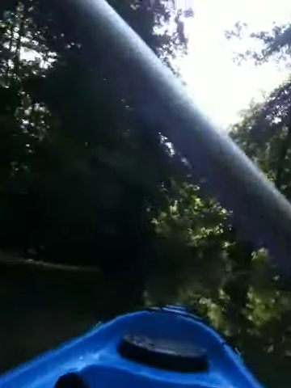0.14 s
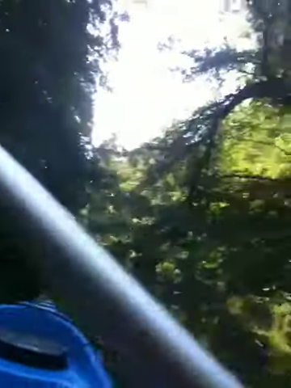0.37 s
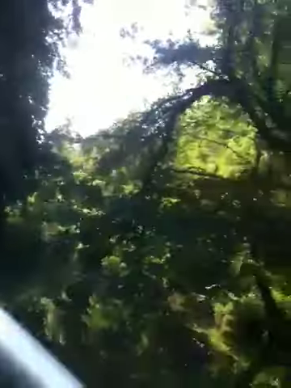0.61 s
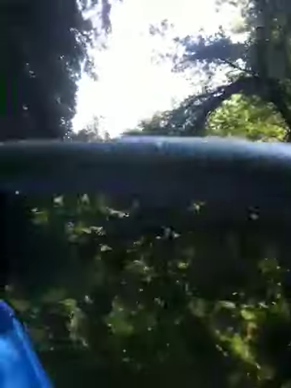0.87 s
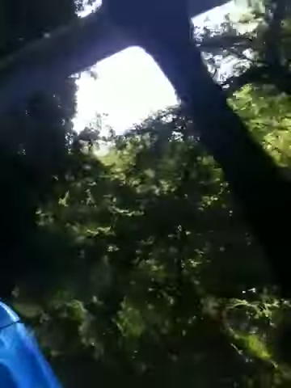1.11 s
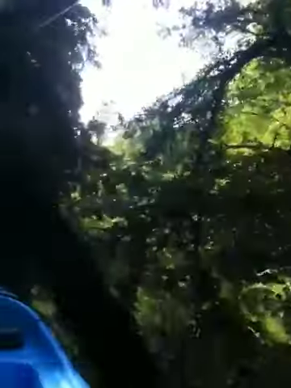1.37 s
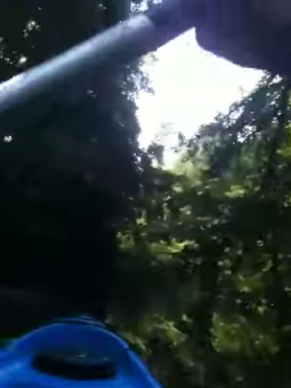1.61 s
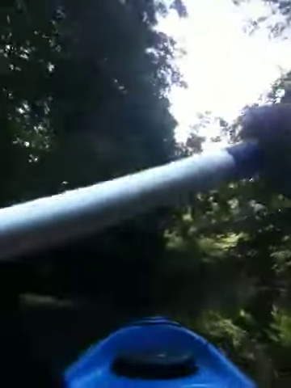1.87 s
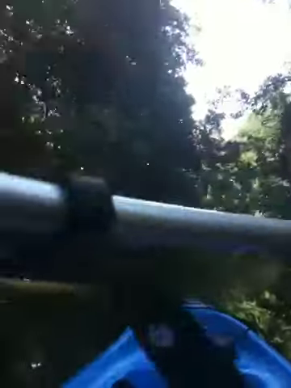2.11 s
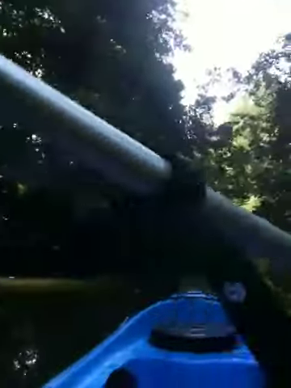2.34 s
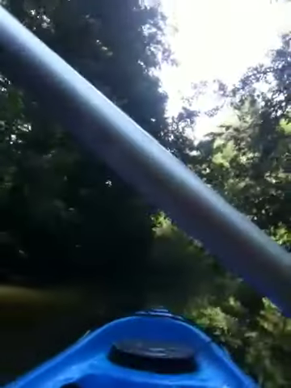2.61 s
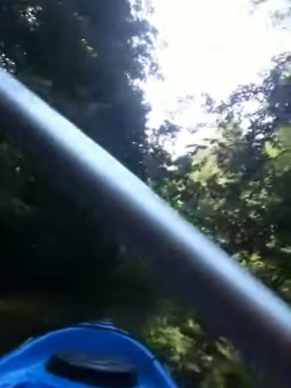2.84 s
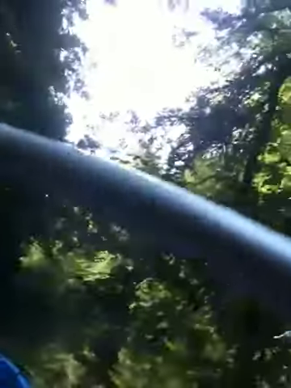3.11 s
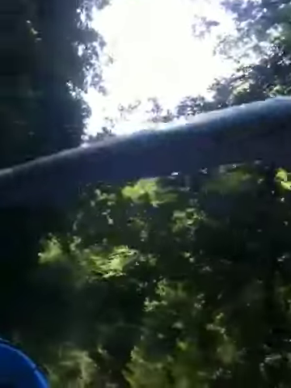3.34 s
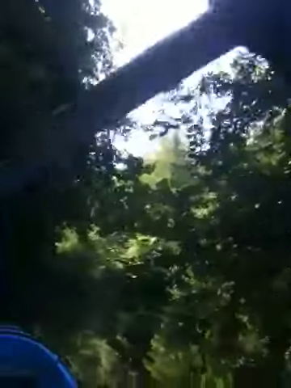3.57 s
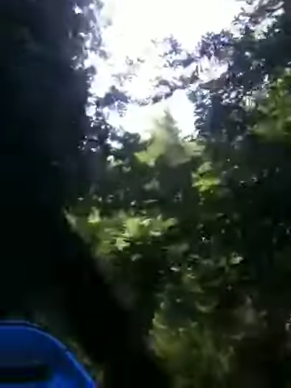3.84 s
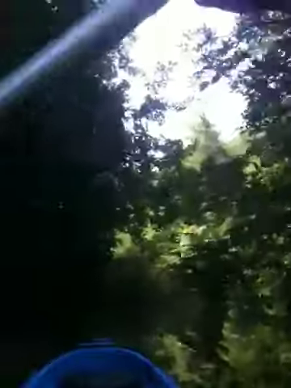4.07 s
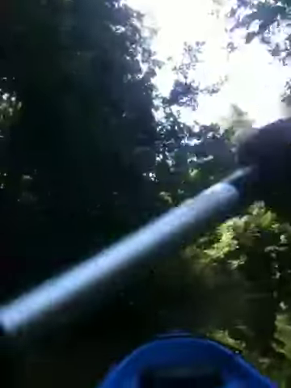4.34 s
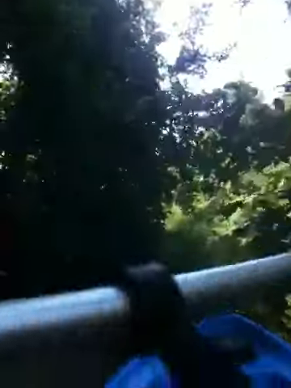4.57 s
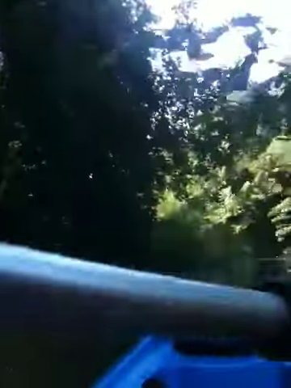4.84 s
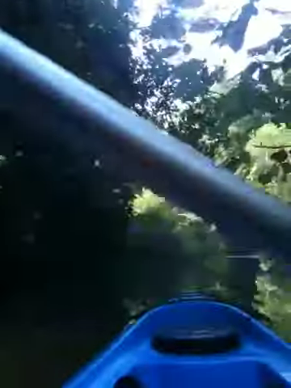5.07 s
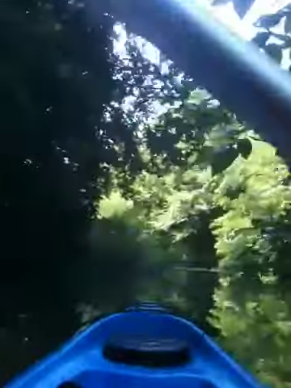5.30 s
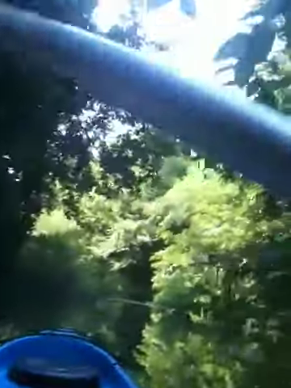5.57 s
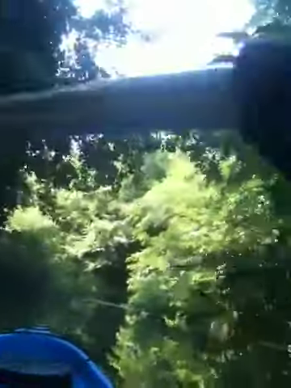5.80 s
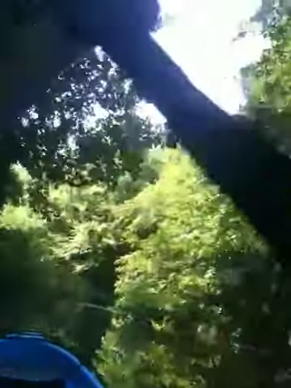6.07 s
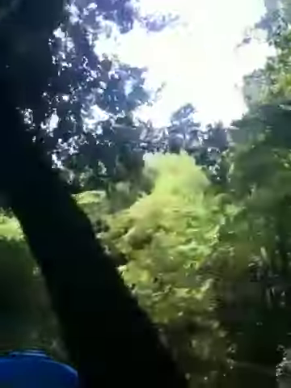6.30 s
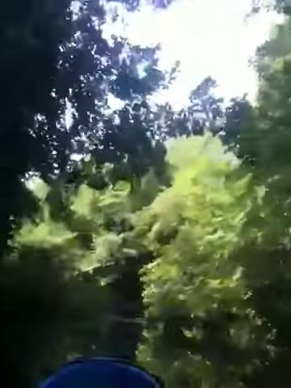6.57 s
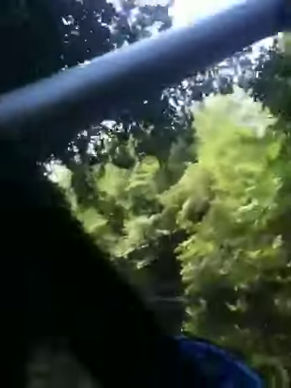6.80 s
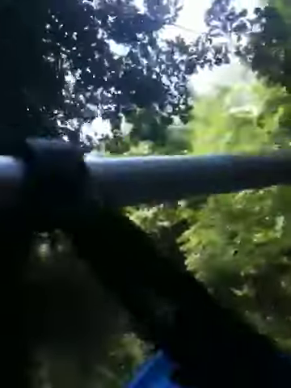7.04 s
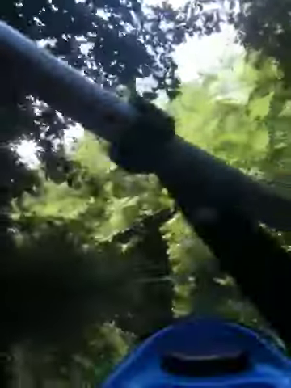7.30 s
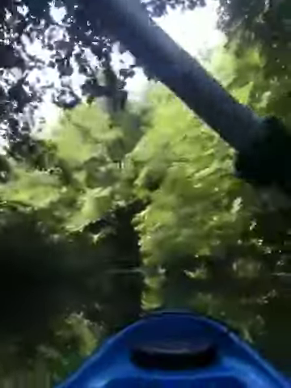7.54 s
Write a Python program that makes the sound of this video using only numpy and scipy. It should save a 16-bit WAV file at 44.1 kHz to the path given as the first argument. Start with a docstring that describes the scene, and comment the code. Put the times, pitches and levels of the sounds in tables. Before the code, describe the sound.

A kayaker's vest ticks, creaks and knocks against a close chest microphone while water gurgles and drips softly around paddle and hull.

```python
"""On a calm wooded stream, heard from a small camera worn on a paddling kayaker's chest.
The quiet wash of water and woods (shaped noise) runs throughout; a thin sleeve hiss and a soft rustle open it.
Bubbles (gliding sines) gurgle and drip around blade and hull, from the first moments to the end.
With every twist the vest sticks and slips on the housing, in ticks that ring it (decaying sines): a burst
after 1 s, the hardest near 3 s, more until 4 s, another burst past 5 s, then lighter ticks to the end."""
import sys
import numpy as np
from scipy import signal
from scipy.io import wavfile
from scipy.ndimage import uniform_filter1d

SR = 44100
rng = np.random.default_rng(int(sys.argv[2]) if len(sys.argv) > 2 else 0)


def decibels_to_gain(level_db):
    """Convert a level in decibels to a linear amplitude gain (20 dB per decade)."""
    exponent = np.asarray(level_db, float) / 20
    return 10 ** exponent


def unload_audio(sound):
    """Save the sound as a 16-bit wav file, at the path given as the first command line argument."""
    columns = np.transpose(np.atleast_2d(sound))
    # keep every value between -1 and 1, then stretch to whole-number steps
    steps = np.round(np.clip(columns, -1, 1) * 32767)
    wavfile.write(sys.argv[1], SR, steps.astype(np.int16))


N = 338247  # samples


def evened(x):
    """Scales to rms 1."""
    return x / np.sqrt(np.mean(x ** 2) + 1e-20)


def add(mix, s, sound):
    """Mixes a sound in at second s."""
    part = mix[round(s * SR):][:len(sound)]
    part += sound[:len(part)]


# The wash all around the boat, before the microphone's own colour.
# Each row: frequency in Hz, relative level in dB per Hz.
STREAM_SPECTRUM = [(18, -64), (30, -32), (70, -28), (154, 16.5), (235, -3), (577, -17), (772, 11.5),
                   (1210, -13), (2050, 5.5), (3130, -19), (9480, -14), (14800, -15.5), (16500, -63)]


def stream():
    """The quiet wash of water and woods: random short-time spectra with drifting patches."""
    frames, hz = N // 256 + 5, np.fft.rfftfreq(1024, 1 / SR)
    real, imaginary, patches = rng.standard_normal((frames, 513, 3)).T
    patches = uniform_filter1d(patches, size=10, axis=0)  # over frequency
    patches = evened(uniform_filter1d(patches, size=8, axis=1))  # over time
    table_hz, table_db = np.transpose(STREAM_SPECTRUM)
    colour_db = np.interp(np.log(hz + 1), np.log(table_hz), table_db)[:, None]
    spectra = (real + 1j * imaginary) * decibels_to_gain(colour_db + 5.7 * patches)
    wash = signal.istft(spectra, nperseg=1024, noverlap=768)[1][:N]
    return decibels_to_gain(-56.5) * evened(wash)


# Twists of the body at the chest, each dragging the vest along; layers add their own gain to these levels.
# Each row: start in seconds, end in seconds, scrape level in dB,
# rumble above scrape in dB, swish above scrape in dB.
TWISTS = [(0.0, 0.171, -51, 9.5, 2.5), (0.698, 0.929, -57, -7, -1), (1.001, 1.142, -60, 4, 6),
          (1.163, 1.22, -41, 9, -10), (1.25, 1.356, -35, 8, -21), (1.352, 1.41, -47.5, 14.5, -8),
          (1.505, 1.722, -47, 9, -16), (1.736, 1.794, -44.5, 12, 0), (1.827, 1.854, -47, 4, -17),
          (2.523, 2.701, -52.5, 11.5, 3), (2.966, 3.049, -42, 13, -18), (3.057, 3.111, -28.5, 8.5, -22),
          (3.132, 3.168, -34.5, 0, -22), (3.19, 3.234, -52, -13, -6), (3.468, 3.518, -38.5, 9.5, -26),
          (3.532, 3.634, -38.5, 7, -18), (3.638, 3.731, -45, 6, -11), (3.802, 3.833, -29.5, 6, -3.5),
          (3.833, 3.867, -32, 5.5, -13), (3.939, 4.01, -37.5, 1.5, -17), (4.006, 4.058, -33.5, 14, -11.5),
          (4.066, 4.129, -49.5, -7, -24), (4.286, 4.45, -50.5, 15.5, -9), (4.976, 5.162, -54.5, 13, 3),
          (5.236, 5.315, -44, 16.5, -15), (5.43, 5.479, -49.5, -6, -6), (5.497, 5.557, -41, 8.5, -12),
          (5.568, 5.666, -34.5, 1.5, -9), (5.673, 5.729, -33, 0, -8), (6.061, 6.103, -53, -6, 5),
          (6.27, 6.397, -50.5, 1, 9), (6.409, 6.49, -48, 15, -1), (7.241, 7.415, -51.5, 2, -4),
          (7.43, 7.558, -46, 14, -3), (7.583, 7.699, -41.5, 13, 0.5)]
# How much the body shifts between twists, close to the microphone.
# Each row: time in seconds, rumble level in dB.
SHIFTING = [(0.0, -33), (0.12, -48), (0.25, -43.5), (0.886, -41.5), (0.954, -50), (1.14, -41.5),
            (1.86, -46.5), (1.89, -56), (2.3, -56.5), (2.52, -48.5), (2.93, -46), (3.19, -53),
            (3.42, -43.5), (3.76, -43.5), (3.92, -50), (4.09, -36), (4.28, -44), (4.935, -59.5),
            (5.2, -44.5), (5.39, -51), (6.25, -54.5), (6.58, -51.5), (6.73, -47.5), (7.0, -53.5),
            (7.12, -56), (7.35, -41), (7.669, -45)]
GRIP_S, BUILD_DB, LET_GO_S = 0.0154, 3.5, 0.024  # a firm drag grips, builds up over the twist and lets go
FIRM_DB, SLOWER_PER_DB = -47.5, 0.625  # a lighter drag grips and lets go more slowly


def motion():
    """Scrape, rumble and swish level for every sample: the slow shifting plus the drag of each twist."""
    t = np.arange(N) / SR
    rumble_db = np.interp(t, *np.transpose(SHIFTING))
    shift = rumble_db + 47  # dB above rest
    power = decibels_to_gain([-55 + 0.56 * shift, rumble_db, -59.5 + 0.25 * shift]) ** 2
    for start, end, db, weight_db, bright_db in TWISTS:
        slower = 1 + SLOWER_PER_DB * max(FIRM_DB - db, 0)
        grip_s, let_go_s = slower * GRIP_S, slower * LET_GO_S
        part = slice(round(start * SR), round((end + let_go_s) * SR))
        u = t[part]
        grip = np.clip((u - start) / grip_s, 0, 1)
        let_go = np.clip(1 - (u - end) / let_go_s, 0, 1) ** 2
        build = decibels_to_gain(db - BUILD_DB * np.clip((end - u) / (end - start), 0, 1))
        drag = grip * let_go * build
        power[:, part] += (drag * decibels_to_gain(np.array([[0], [weight_db], [bright_db]]))) ** 2
    return 10 * np.log10(power)


def rings(modes, count, spread, scatter_db, soft_db=0):
    """One ring per blow, peak 1: where it lands shifts and weights the modes; soft blows spare upper ones."""
    hz, db, t60 = np.transpose(modes)[:, None, :, None]
    shift, weight, phase = rng.standard_normal((count, len(modes), 3, 1)).transpose(2, 0, 1, 3)
    t = np.arange(2000) / SR
    octaves_up = np.maximum(np.log2(hz / modes[1][0]), 0)  # above the second mode
    db = db - np.reshape(soft_db, (-1, 1, 1)) * octaves_up
    contact = 1 - np.exp(-(t * hz * 4.03) ** 2)  # the push builds over a fraction of a cycle
    swing = np.sin(2 * np.pi * hz * (1 + spread * shift) * t + 1.39 * phase)
    decay = decibels_to_gain(db + scatter_db * weight - 60 * t / t60)
    ring = (decay * contact * swing).sum(1)
    return ring / abs(ring).max(1, keepdims=True)


def sparse(per_s, spread_db):
    """Random impulses of either sign; a few are large."""
    size = decibels_to_gain(spread_db * np.minimum(rng.exponential(1, N), 4))
    return size * rng.choice([-1., 1.], N) * (rng.random(N) < per_s / SR)


def rustle(modes, level_db, per_s, spread_db, lumps_db, soft_db=0):
    """Many tiny slips of the cloth, each ringing one part of the housing; the drag comes in lumps."""
    grains = rings(modes, count=10, spread=0.11, scatter_db=5.0, soft_db=soft_db)
    dense = np.zeros(N)
    for grain in grains:
        dense += signal.oaconvolve(sparse(per_s / len(grains), spread_db), grain)[:N]
    lumps = uniform_filter1d(rng.standard_normal(N), size=700)
    lumps = evened(uniform_filter1d(lumps, size=700))
    return decibels_to_gain(level_db) * evened(dense * decibels_to_gain(lumps_db * np.clip(lumps, -2, 2)))


# What the housing around the microphone rings with, from low to high: thump, knock and snap.
# Each row: frequency in Hz, relative level in dB, time to fall 60 dB in seconds.
THUMP_MODES = [(148, -32, 0.013), (237, 2.5, 0.027), (400, 6.5, 0.022), (620, 7, 0.024)]
KNOCK_MODES = [(950, -11.5, 0.014), (1400, 3, 0.0037), (2200, 5, 0.0034), (2600, 0, 0.001)]
SNAP_MODES = [(4240, 3, 0.002), (6170, 6, 0.0015), (8850, -4, 0.0023), (10830, -11.5, 0.0011),
              (13640, -5.5, 0.00096)]
# Thin bright hiss of a sleeve sliding past the chest.
# Each row: start in seconds, end in seconds, relative level in dB.
SLEEVE = [(0., 0.198, -67), (4.992, 5.18, -58), (6.253, 6.432, -48), (6.389, 6.53, -56),
          (7.392, 7.531, -58)]
# The colour of that hiss.
# Each row: frequency in Hz, relative level in dB, time to fall 60 dB in seconds.
SLEEVE_MODES = [(10150, 9, 0.0025), (11400, -1, 0.0071)]


def cloth():
    """Crackle, scrape, rumble and swish of the moving vest, and the hiss of the sleeve, as dense tiny slips."""
    scrape_db, rumble_db, swish_db = motion()
    t = np.arange(N) / SR
    slide = np.zeros(N)
    for start, end, db in SLEEVE:
        progress = np.clip((t - start) / (end - start), 0, 1)
        slide += decibels_to_gain(db + 1.5) * np.sin(np.pi * progress) ** .6
    slide = uniform_filter1d(slide, size=900)
    crackle_db = scrape_db + np.minimum(scrape_db + 46.5, 0) - 3.5  # hard drag breaks up into small slips
    crackle = rustle(KNOCK_MODES + SNAP_MODES, crackle_db, per_s=350, spread_db=2.3, lumps_db=0.33)
    scrape = rustle(KNOCK_MODES, scrape_db - 1.5, per_s=2500, spread_db=4.3, lumps_db=0.25)
    rumble = rustle(THUMP_MODES, rumble_db - 3.5, per_s=300, spread_db=2.1, lumps_db=0.83, soft_db=10.9)
    swish = rustle(SNAP_MODES, swish_db - 3, per_s=6000, spread_db=3.8, lumps_db=0.37)
    hiss = slide * rustle(SLEEVE_MODES, 0, per_s=4500, spread_db=1.2, lumps_db=1.0)
    return crackle + scrape + rumble + swish + hiss


def bubble(hz_from, hz_to, length, db):
    """A gliding sine with a quick start and a soft end."""
    u = np.arange(round(length * SR)) / (length * SR)
    turns = np.cumsum(hz_from * (hz_to / hz_from) ** u) / SR
    return decibels_to_gain(db + 2.5) * np.sin(np.pi * u ** 0.55) * np.sin(2 * np.pi * turns)


def small_bubble(hz, rise, cycles, db):
    """A short bubble of rising pitch; rise and cycles run from 0 to 1."""
    return bubble(hz, (1 + 0.33 * rise) * hz, (2.7 + 12 * cycles ** 2) / hz, db)


# Single bubbles around blade and hull, nearly all rising in pitch as they near the surface.
# Each row: time in seconds, start pitch in Hz, end pitch in Hz, length in seconds, relative level in dB.
BUBBLES = [(0.153, 1840, 2290, 0.019, -37), (0.169, 404, 436, 0.015, -29), (0.29, 1400, 1970, 0.05, -47),
           (0.472, 557, 620, 0.04, -41), (0.541, 1530, 1860, 0.0061, -34.5), (0.687, 466, 550, 0.014, -34),
           (0.704, 459, 450, 0.044, -40), (0.745, 1930, 2310, 0.0066, -43), (.756, 695, 810, 0.014, -36.5),
           (0.778, 206, 440, .075, -37), (0.873, 400, 632, 0.031, -35), (0.907, 620, 930, 0.012, -39.5),
           (1.426, 2200, 3300, 0.007, -42), (2.324, 294, 330, 0.0068, -37.5),
           (2.436, 1400, 1710, 0.011, -47), (2.501, 429, 573, 0.012, -38), (2.65, 2215, 2737, 0.0053, -39),
           (2.672, 1720, 2100, 0.0061, -33.5), (4.105, 400, 448, .02, -53), (4.64, 1700, 1900, 0.0081, -46),
           (5.769, 1520, 1923, 0.0088, -41.5), (5.774, 2360, 2800, 0.0084, -46.5),
           (6.737, 810, 1290, 0.016, -35), (6.749, 1860, 2040, 0.012, -41), (6.848, 800, 850, 0.011, -51),
           (6.857, 1900, 2400, .007, -49), (6.976, 786, 830, .012, -52), (7.018, 454, 520, 0.02, -44.5),
           (7.032, 790, 950, 0.012, -33), (7.047, 830, 900, 0.0083, -36)]
# Swirls of water leaving the blade, each a crowd of like-sized bubbles.
# Each row: start in seconds, end in seconds, middle pitch in Hz, relative level in dB.
SWIRLS = [(0.361, 0.56, 1490, -53.5), (0.641, 0.936, 620, -51.5), (0.651, 0.736, 1300, -52),
          (0.875, 0.919, 1780, -49.5), (0.963, 1.123, 1720, -51.5), (1.499, 1.749, 370, -46),
          (1.93, 2.058, 1290, -57), (2.709, 2.791, 1740, -45.5), (4.094, 4.12, 3500, -50),
          (4.129, 4.217, 2190, -50), (4.125, 4.264, 785, -54), (4.298, 4.48, 765, -48),
          (5.376, 5.432, 2613, -52.5), (5.834, 6.118, 2065, -58.5), (6.421, 6.517, 351, -55),
          (6.698, 6.771, 3670, -59), (7.021, 7.047, 3270, -51), (7.26, 7.367, 600, -52.5)]
GURGLES_PER_S, SWIRL_BUBBLES_PER_S = 300, 320


def water():
    """The single bubbles, the swirls, and a gurgle of small bubbles that the twists of the body stir up."""
    out = np.zeros(N)
    stir_db = np.minimum(motion()[0], -48)  # follows the scrape level, up to a limit
    for s, *shape in BUBBLES:
        add(out, s, bubble(*shape))
    for when, size, luck, rise, cycles in rng.random((round(GURGLES_PER_S * N / SR), 5)):
        db = stir_db[int(when * N)] - 2.5 - 4.5 * np.log(luck + 0.04) - 8 * size
        add(out, when * N / SR, small_bubble(280 * 14 ** size, rise, cycles, db))
    for start, end, hz, db in SWIRLS:
        count = round(SWIRL_BUBBLES_PER_S * (end - start))
        for when, size, luck, rise, cycles in rng.random((count, 5)):
            one_hz = hz * 2.13 ** (size - .5)
            one = small_bubble(one_hz, rise, cycles, db - 3 * np.log(luck + 0.14))
            add(out, start + when * (end - start), one)
    return out


SMALL_SLIPS_PER_S, COLOUR_SCATTER_DB = 200, 14.5
FIRM_SLIPS_MORE = 0.32  # dB per dB: the firmer the drag, the more of it breaks into slips


def small_slips():
    """Weaker slips at random moments of each twist; they take their colour from the drag."""
    rows = []
    for start, end, db, weight_db, bright_db in TWISTS:
        count = round(SMALL_SLIPS_PER_S * (end - start))
        for when, luck, high, low in rng.random((count, 4)):
            knock_db = db + 6.5 + FIRM_SLIPS_MORE * min(db - FIRM_DB, 0)
            knock_db += 5.5 * np.log(luck + 0.043) - BUILD_DB * (1 - when)
            snap_db = -1 + 0.44 * bright_db + COLOUR_SCATTER_DB * (high - .5)
            thump_db = -3 + 0.47 * weight_db + COLOUR_SCATTER_DB * (low - .5)
            rows.append((start + when * (end - start), knock_db, snap_db, thump_db))
    return rows


# The clearest slips of the vest on the housing, right at the microphone; slips() adds a gain to each part.
# Each row: time in seconds, knock level in dB, snap above knock in dB, thump above knock in dB.
CLEAR_SLIPS = [(0.1743, -27, -7, 7.5), (0.3439, -31, -8, 1.5), (1.1759, -28.5, -8, 4.5),
               (1.1868, -26, 8, 3), (1.194, -28, -5, 2), (1.2084, -23.5, -3, 4), (1.2352, -24.5, -0.5, -3),
               (1.2445, -27, -16, 3), (1.2702, -24.5, -19, 2), (1.288, -30, -17, 2), (1.304, -31, 6, 7),
               (1.3163, -18.5, -5, -24), (1.3265, -21, 1.5, 6.5), (1.3378, -24, -1, 6),
               (1.3524, -24.5, -4, 6.5), (1.5872, -33, -2.5, 13), (1.6553, -33, 8, -11),
               (1.695, -29, 5.5, 10.5), (1.729, -31, 3, 5), (1.7532, -23, -6, 3), (1.7599, -27, 1, -2),
               (1.7773, -31.5, 0, 7.5), (1.8255, -31, -2, -13), (1.8314, -27.5, -2, 1),
               (1.8408, -30, 1.5, 6.5), (1.853, -31, -2, 0), (1.8609, -25.5, 0, 4), (2.0106, -35.5, -3, 0),
               (2.0229, -36.5, -2, 2), (2.0729, -32, 3, 5), (2.0783, -23.5, 1, -1), (2.1295, -28.5, 0, 5),
               (2.6113, -28.5, -4, -1.5), (2.616, -26.5, 0, -8), (2.8294, -30.5, -9.5, 4),
               (2.9792, -24, -1.5, 2), (2.9864, -27, -5, 1), (2.999, -25.5, -15, 4), (3.0097, -18, -14, 0),
               (3.0204, -20.5, -4, 3), (3.0376, -14.5, -5, -14), (3.0471, -13.5, -2, 1.5),
               (3.059, -11.5, -9, -1.5), (3.0771, -22, -9, 4), (3.09, -9.5, -4, 3), (3.1018, -11, -21, -23),
               (3.1097, -6, -4, -10), (3.1156, -9, -2.5, 1.5), (3.1374, -23, -18, 0),
               (3.153, -16.5, -10, 4.5), (3.173, -16.5, -4.5, -3), (3.392, -21, -5.5, -4),
               (3.4128, -17.5, -7, 0.5), (3.4633, -33, -14, 4), (3.49, -20.5, -11, -2),
               (3.5315, -20.5, -11, 5), (3.541, -15, -4.5, -4), (3.5593, -27, -5, 0),
               (3.5791, -18, -4.5, 4.5), (3.5998, -24, 1, -13), (3.6135, -13.5, -17, -6),
               (3.6164, -20.5, -1, -1), (3.6226, -19.5, -5, -7), (3.661, -26.5, -0.5, 4),
               (3.7059, -25.5, -6, -14), (3.7297, -29, 0, -21), (3.7938, -16.5, -3, -8),
               (3.8084, -22, 9, 1), (3.8225, -27, 2, -2), (3.8376, -23.5, 3, 0), (3.8651, -32, -13, 7),
               (3.9574, -31, -20, 4), (4.019, -24.5, 2, 6), (4.0322, -25.5, -2, 20),
               (4.0457, -24.5, -10, 6), (4.0555, -14, -10, 12.5), (5.2572, -38, 8, 5),
               (5.2672, -15.5, -5, -38), (5.289, -22.5, -13, 9.5), (5.3198, -23, -3, -1),
               (5.4506, -25.5, -7, -3), (5.4585, -37, -2, -3), (5.466, -29, -5, 1), (5.498, -22, 8, -3),
               (5.511, -19.5, -5, -0.5), (5.531, -27, 2, -21), (5.5448, -18, -1, -3),
               (5.5521, -22.5, -2, 7.5), (5.5672, -35, -4, -6), (5.5782, -18.5, 5, -2),
               (5.5929, -9, -5, -4), (5.5969, -12, 2.5, -17), (5.6048, -31, 9, -13), (5.6131, -32, 13, -20),
               (5.6193, -24.5, -8, 10), (5.6288, -20.5, 3.5, 1), (5.6334, -15, 0, -14),
               (5.6415, -14, -14, -2), (5.654, -21.5, 9, -18), (5.6776, -15.5, 0.5, -1),
               (5.6946, -24.5, 4, 2), (5.7072, -23, 4.5, -21), (5.7293, -25, -1, -10), (5.9183, -49, 16, 6),
               (5.9317, -40, 6.5, 5.5), (5.994, -48, 10.5, 7), (6.2109, -44.5, 7, -18),
               (6.3315, -34.5, 5, -1), (6.369, -39.5, -4, 9), (6.4946, -36, -4, -6), (6.7168, -30, -3.5, 8),
               (6.9706, -41.5, 3, -11), (7.3722, -30.5, -5, -2), (7.5498, -32.5, -17, 12),
               (7.5688, -23, 1, 2), (7.6205, -31, 2.5, -3), (7.655, -29, -3, -6)]
LEAD_S, LEAD_DB = .0018, -16.5  # mean lead in seconds, and level in dB: a faint copy of each tick sounds just before it


def slips():
    """Each slip snaps, knocks and thumps the housing; the cloth chatters on in a few weaker rebounds."""
    rows = list(CLEAR_SLIPS) + small_slips()
    s, knock_db, snap_db, thump_db = np.transpose(rows)[:, :, None]
    count = len(rows)
    knock = decibels_to_gain(knock_db + 6.0) * rings(KNOCK_MODES, count, spread=0.032, scatter_db=5)
    snap = decibels_to_gain(knock_db + snap_db + 8.0) * rings(SNAP_MODES, count, spread=0.12, scatter_db=5)
    soft_db = np.maximum(thump_db, 0)  # heavy thumps are duller
    thump = decibels_to_gain(knock_db + thump_db - 1.8) * rings(THUMP_MODES, count, 0.1, 1.3, soft_db)
    signs, waits = rng.choice([-1., 1.], (count, 6)), rng.random((count, 4))
    out = np.zeros(N)
    for at, mid, high, low, sign, wait in zip(s[:, 0], knock, snap, thump, signs, waits):
        tick = mid + sign[4] * high
        add(out, at, sign[0] * tick + sign[5] * low)
        add(out, at - LEAD_S * (.5 + wait[0]), sign[3] * decibels_to_gain(LEAD_DB) * tick)
        rebound_lags = np.cumsum(.0005 + .0016 * wait)  # seconds
        for lag, turn in zip(rebound_lags, sign[1:]):
            add(out, at + lag, turn * decibels_to_gain(-9.5 - 2500 * lag) * tick)
    return out


def scene():
    """Everything near the one microphone."""
    return (stream() + cloth() + water() + slips())[None]


def low_pass(x):
    """Removes everything above the highest recorded frequency."""
    return signal.sosfilt(signal.butter(12, 16690, fs=SR, output="sos"), x)


CEILING = .75  # full scale is 1
LOW_CUT_HZ, DULL_HZ, TOP_HZ = 115.3, 12100, 16400


def record(dry):
    """The hardest ticks are rounded off; the microphone drops the deep bass and dulls the top."""
    rounded = CEILING * np.tanh(dry / CEILING)
    low_cut = signal.butter(4, LOW_CUT_HZ, "high", fs=SR, output="sos")
    cut = signal.sosfilt(low_cut, rounded) + decibels_to_gain(-19) * rounded  # a little bass remains
    cut = signal.sosfilt(signal.butter(2, DULL_HZ, fs=SR, output="sos"), cut)
    cut = signal.oaconvolve(cut, signal.firwin(255, TOP_HZ, fs=SR)[None], "same")
    return low_pass(cut)


dry = scene()
out = record(dry)
unload_audio(out)
```